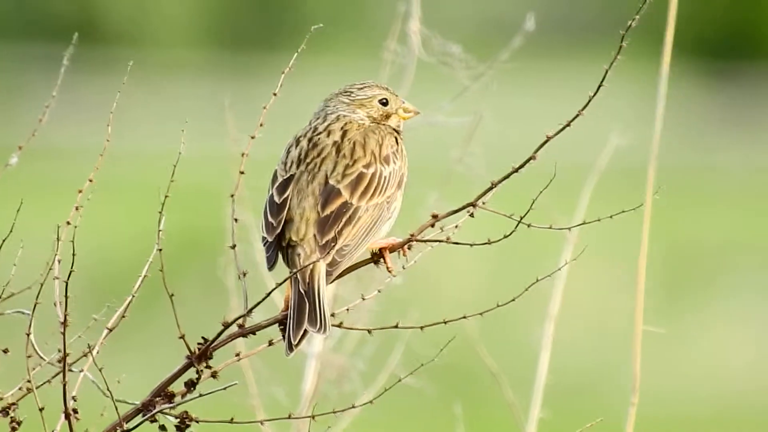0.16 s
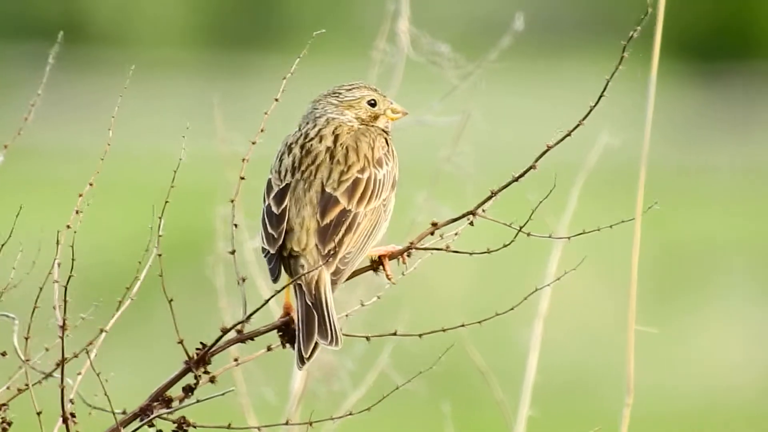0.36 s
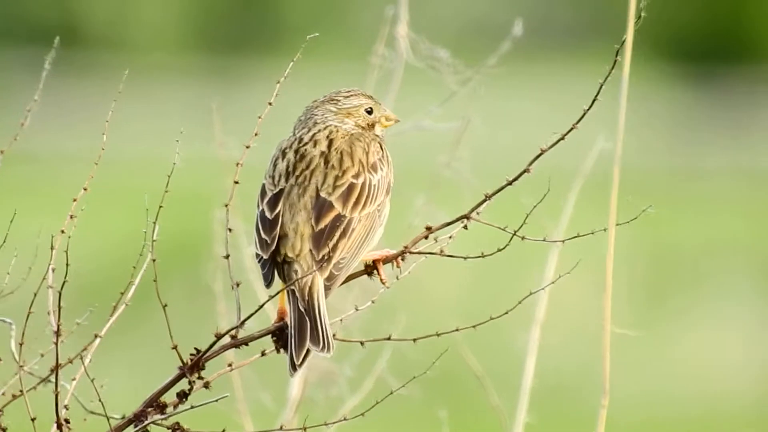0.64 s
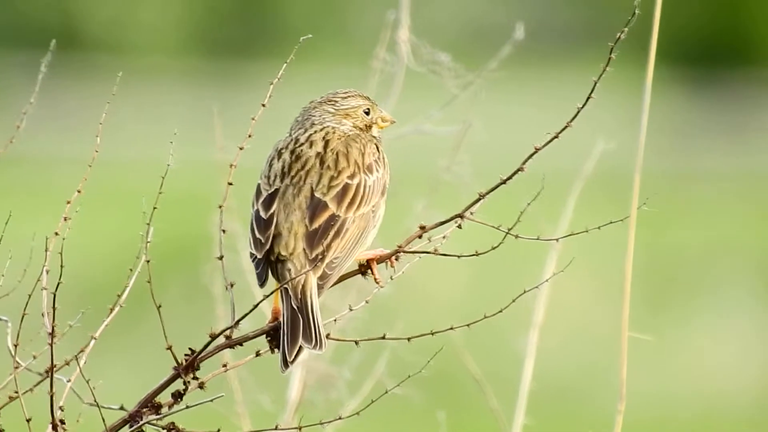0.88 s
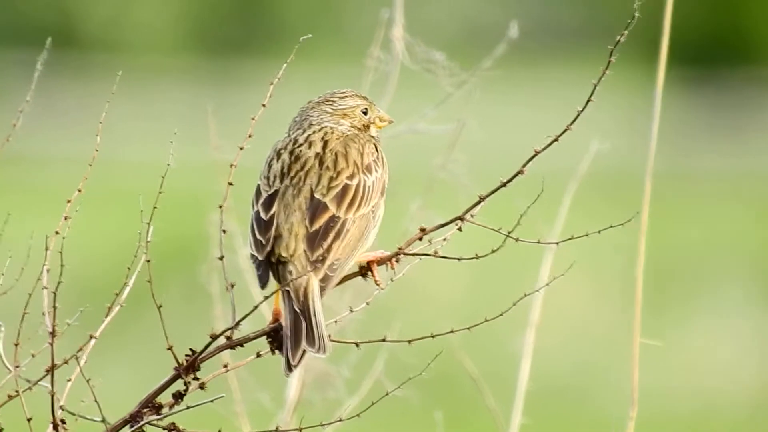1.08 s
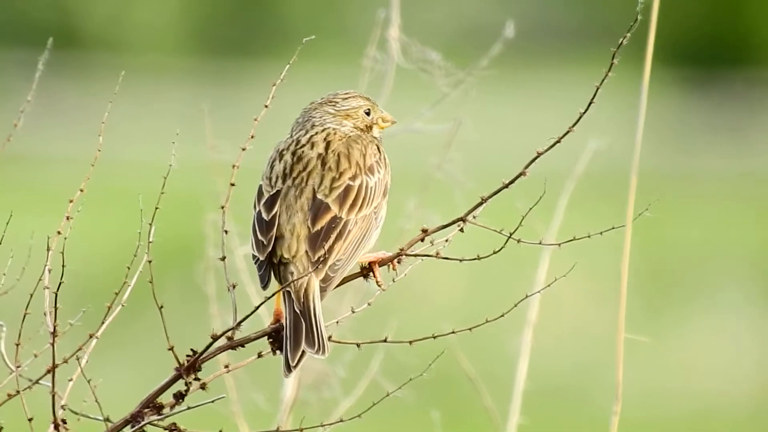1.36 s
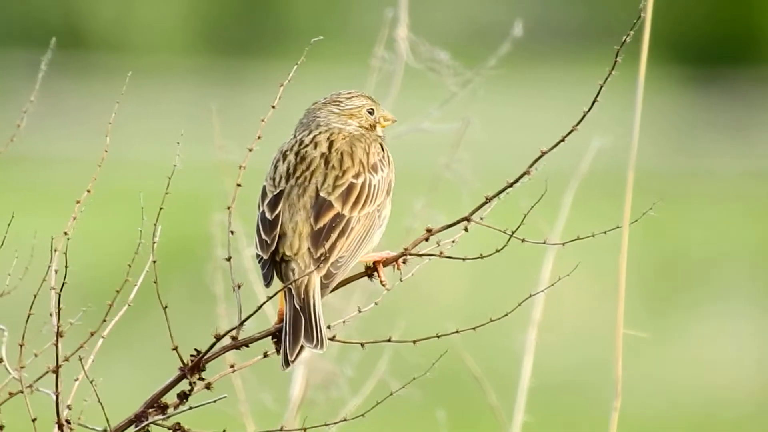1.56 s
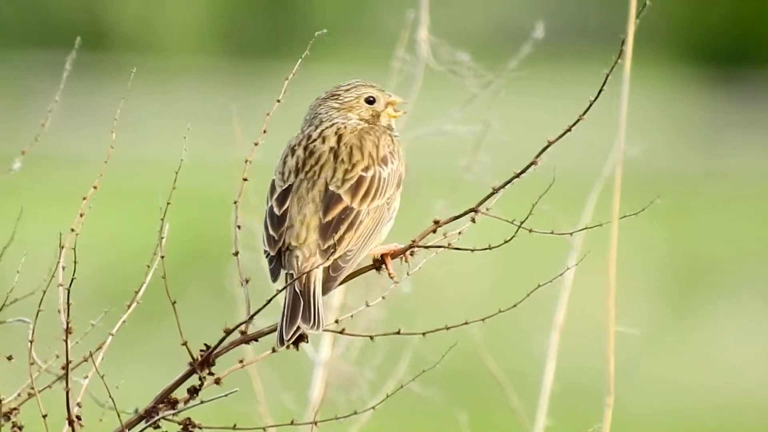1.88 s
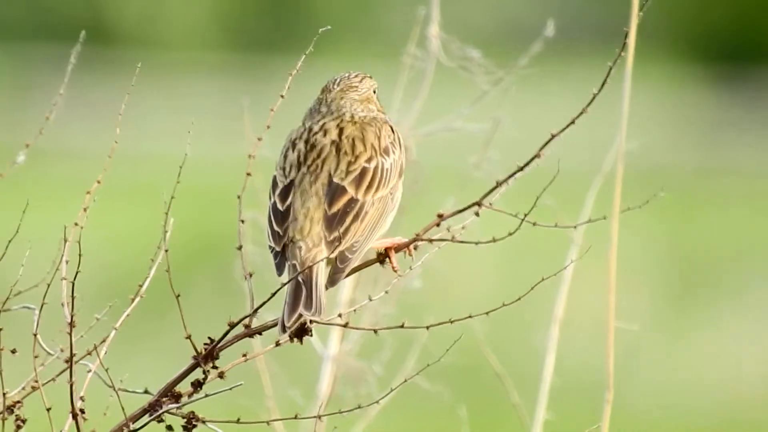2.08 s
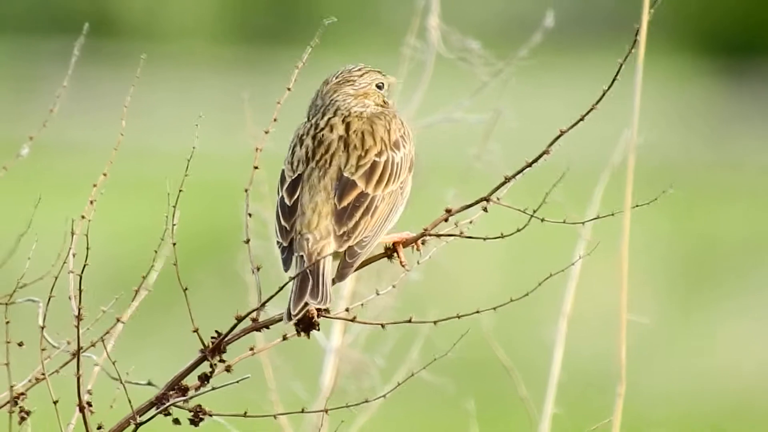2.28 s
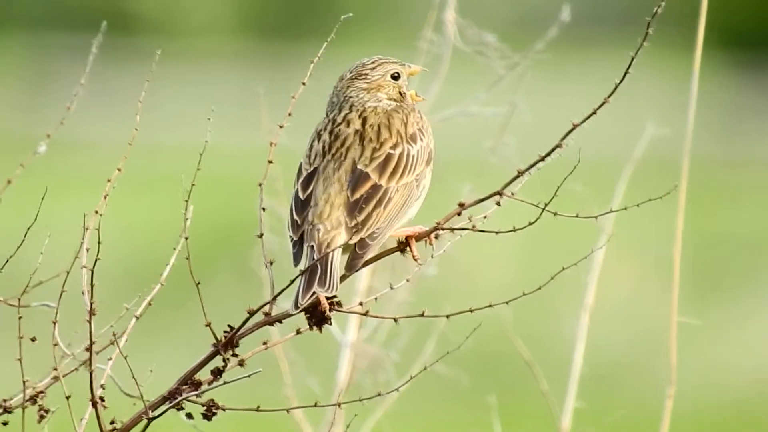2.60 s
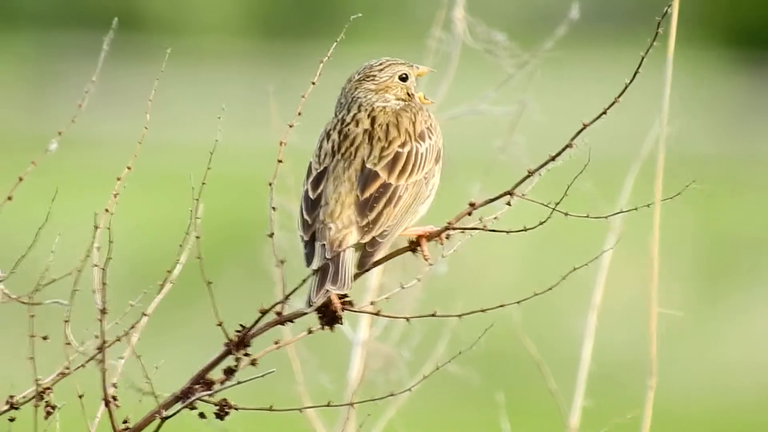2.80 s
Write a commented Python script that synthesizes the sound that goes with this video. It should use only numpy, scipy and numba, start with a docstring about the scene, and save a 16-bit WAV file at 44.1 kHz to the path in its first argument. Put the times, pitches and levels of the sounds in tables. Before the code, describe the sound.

A small bird sings outdoors through strong wind that rumbles and thumps unevenly on the microphone throughout. A distant bird chatters faintly in the first half second, over a soft field hum. The near bird gives three high, falling chips from about 1.8 to 2.2 seconds, three quick ticks around 2.5, then a fast jangling, buzzy rattle from 2.6 until about 3 seconds.

```python
"""Small bird in gusty wind

A bird on a twig chips, ticks three times, speeds up and breaks into a jangling rattle of glides and
modulated tones. A far bird chatters faintly at the start, over the hum of an open field. Turbulent
wind buffets the two microphone ports, each in its own way, and drives the recorder's limiter, whose
late, abrupt grip snaps the crests of the rumble."""
import sys
import numpy as np
from scipy import signal
from scipy.fft import rfft, irfft
from scipy.io import wavfile
from scipy.ndimage import uniform_filter1d
from numba import njit

SR = 44100
rng = np.random.default_rng(int(sys.argv[2]) if len(sys.argv) > 2 else 0)


def materialize(psi):
    """Save the field psi as 16-bit PCM at rate SR to the path in sys.argv[1].

    A 1-D psi becomes a single channel; in a 2-D psi each row is a channel.
    """
    bounded = np.clip(np.atleast_2d(psi).T, -1, 1)
    quanta = np.round(bounded * 32767).astype(np.int16)
    wavfile.write(sys.argv[1], SR, quanta)


N = 129654
BIN_HZ = np.fft.rfftfreq(N, 1 / SR)


def amp(db):
    """Amplitude ratio of a level in decibels."""
    return 10 ** (np.asarray(db) / 20)


def unit_rms(x):
    """Normalisation of each channel to unit power."""
    return x / np.sqrt(np.mean(x ** 2, -1, keepdims=True) + 1e-20)


def add(mix, start_s, sound):
    """Superposition of a sound on the mix."""
    part = mix[max(round(start_s * SR), 0):][:len(sound)]
    part += sound[:len(part)]


def noise(spectrum):
    """Spectral shaping: two independent noises of unit power, silent above the last point."""
    hz, db = np.transpose(spectrum)
    shape = amp(np.interp(np.log(BIN_HZ + 1), np.log(hz + 1), db)) * (BIN_HZ < hz[-1])
    return unit_rms(irfft(rfft(rng.standard_normal((2, N))) * shape, N))


def drift(hz):
    """Low-pass noise: a random fluctuation up to about hz."""
    return noise([(hz / 8, 0), (hz, -3), (hz * 4, -60)])


def whistle(pitch_hz, wobble=.01):
    """Phase integrates frequency: a slightly unsteady tone with a faint second harmonic."""
    jitter = unit_rms(uniform_filter1d(rng.standard_normal(len(pitch_hz)), size=40))
    phase = 2 * np.pi * (np.cumsum(pitch_hz * (1 + wobble * jitter)) / SR + rng.random())
    return np.sin(phase) + amp(-40) * np.sin(2 * phase)


def glide(length_s, from_hz, to_hz, db, wobble=.01):
    """A linear frequency sweep under a half-sine envelope."""
    progress = np.linspace(0, 1, int(length_s * SR))
    return amp(db) * np.sin(np.pi * progress) * whistle(from_hz + (to_hz - from_hz) * progress, wobble)


# Spectrum of the distant hum and hiss: frequency_hz, relative_db
FIELD_SPECTRUM = [(250, -25), (400, -8), (620, 0), (1000, -5), (1300, -16), (2600, -19), (5000, -13),
                  (9000, -22), (17000, -32)]

def field(level_db=-53):
    """Diffuse ambient sound: coherence between the ports falls as frequency rises."""
    left, independent = rfft(noise(FIELD_SPECTRUM))
    coherence = .6 / (1 + (BIN_HZ / 2000) ** 2)
    right = coherence * left + np.sqrt(1 - coherence ** 2) * independent
    return amp(level_db) * irfft([left, right], N)


# Notes of the far bird: start_s, pitch_hz, level_db
FAR_NOTES = [(.001, 5700, -38), (.049, 5480, -40), (0.079, 5180, -56), (0.103, 5700, -31),
             (.258, 5500, -41.5), (0.283, 5700, -43), (.33, 5200, -48), (.358, 5450, -45),
             (0.429, 5320, -51)]

def far_bird():
    """Faint tone bursts, roughened by random frequency modulation."""
    out = np.zeros(N)
    for start_s, hz, db in FAR_NOTES:
        add(out, start_s, glide(.018, hz, hz, db, wobble=.062))
    return out


# Gusts at each port: start_s, length_s, level_db
LEFT_PORT_GUSTS = [(0, 0.2, -2), (.25, 0.24, -6.5), (.53, 0.15, -4), (.72, 0.17, -6.5), (.95, 0.16, -8.5),
                   (1.44, 0.024, -12), (1.53, 0.047, -10), (1.68, .04, -16.5), (1.78, .12, -10.5),
                   (2.1, 0.075, -6.5), (2.27, 0.088, -10.5), (2.43, 0.15, -11), (2.6, .18, -11)]
RIGHT_PORT_GUSTS = [(0, 0.077, -1.5), (.14, 0.93, -3), (1.29, 0.038, -16), (1.44, 0.2, -5.5),
                    (1.67, 0.031, -10), (1.75, 0.18, -6.5), (2.06, 0.03, -6), (2.14, 0.076, -6),
                    (2.26, 0.12, -4), (2.46, 0.043, -7.5), (2.54, .6, -1)]

def gust_levels(breeze_db=-23, edge_s=.01):
    """Incoherent powers add: the level in dB of breeze plus gusts at each port."""
    t = np.arange(N) / SR
    power = np.full((2, N), amp(2 * breeze_db))
    for port, gusts in zip(power, (LEFT_PORT_GUSTS, RIGHT_PORT_GUSTS)):
        for start_s, length_s, db in gusts:
            inside_s = np.minimum(t - start_s, start_s + length_s - t)
            port += amp(2 * db) * np.clip(inside_s / edge_s + .5, 0, 1) ** 4
    return 10 * np.log10(power)


# Spectra of the wind at the ports: frequency_hz, relative_db
RUMBLE_SPECTRUM = [(10, -49.5), (45, -13), (75, -7), (105, -1.5), (170, -7.5), (230, -16), (330, -76.5),
                   (600, -53.5)]
ROAR_SPECTRUM = [(150, -5), (260, -3.5), (450, -14), (900, -28), (3000, -85.5)]

def wind(lump_db=1.5, flutter_db=6.5, reference_gust_db=-26, reference_roar_db=-58, roar_exponent=1.686):
    """Turbulent pressure: a lumpy rumble, and a fluttering roar that outgrows it by a power law."""
    rumble_db = gust_levels() + lump_db * drift(6)
    roar_db = reference_roar_db + roar_exponent * (rumble_db - reference_gust_db)
    roar_db += flutter_db * drift(47.5)
    return amp(rumble_db) * noise(RUMBLE_SPECTRUM) + amp(roar_db) * noise(ROAR_SPECTRUM)


# Slaps of air on each port, ahead of the limiter: time_s, peak_db
LEFT_PORT_SLAPS = [(.049, 2), (.097, -5), (.83, 0), (2.126, 2), (2.137, -2.5)]
RIGHT_PORT_SLAPS = [(.355, 8), (.417, 4.5), (0.575, 8), (0.667, 3), (.682, -2.5), (0.749, 1), (0.9, 1.5),
                    (0.99, 3.5), (1.447, -7), (2.304, 4.5), (2.366, 8), (2.728, 6.5), (2.903, -4)]

def air_slaps(decay_s=.0011):
    """Pressure transients: each is one quick push and a rebound."""
    out = np.zeros((2, N))
    age = np.arange(0, .015, 1 / SR) / decay_s
    pulse = age ** 2 * (1 - age / 4) * np.exp(-age)
    for port, slaps in zip(out, (LEFT_PORT_SLAPS, RIGHT_PORT_SLAPS)):
        for time_s, db in slaps:
            add(port, time_s - 2 * decay_s, amp(db) * pulse / pulse.max())
    return out


# The near bird's opening chips: start_s, level_db
CHIP_CALLS = [(1.788, -33), (2.007, -17.5), (2.19, -20)]
# Thin second voice after each chip: delay_s, length_s, from_hz, to_hz, relative_db
CHIP_SECOND_VOICE = [(.031, 0.0093, 8000, 6600, -29), (0.022, 0.015, 3670, 3420, -23.5)]

def chips(top_hz=6870, floor_hz=3900, fall_s=.0069, length_s=.023, fade_db=-30):
    """Exponential sweeps: each falls fast, flattens and fades, and a second voice follows."""
    out = np.zeros(N)
    t = np.arange(0, length_s, 1 / SR)
    pitch_hz = floor_hz + (top_hz - floor_hz) * np.exp(-t / fall_s)
    attack = np.minimum(t / .0041, 1) ** 2
    decay = amp(fade_db * t / length_s) * np.minimum((length_s - t) / .0056, 1)
    for start_s, db in CHIP_CALLS:
        add(out, start_s, amp(db) * attack * decay * whistle(pitch_hz))
        for delay_s, *sweep in CHIP_SECOND_VOICE:
            add(out, start_s + delay_s, amp(db) * glide(*sweep))
    return out


# The three ticks: start_s, level_db
TICK_CALLS = [(2.414, -26.5), (2.491, -24), (2.566, -26)]
# Glides within one tick: delay_s, length_s, from_hz, to_hz, relative_db
TICK_GLIDES = [(.001, 0.0061, 4080, 7800, -0.5), (.001, 0.011, 7480, 7500, 2),
               (.008, 0.015, 8770, 7700, -17), (0.017, 0.012, 7980, 7550, -7.5),
               (.007, .0064, 4400, 3950, -13), (.008, 0.028, 3870, 3780, -23)]

def ticks():
    """Temporal fusion: brief overlapping glides are heard as a single tick."""
    out = np.zeros(N)
    for start_s, db in TICK_CALLS:
        for delay_s, *sweep in TICK_GLIDES:
            add(out, start_s + delay_s, amp(db) * glide(*sweep))
    return out


# Single notes, most of them in the rattle: start_s, length_s, from_hz, to_hz, level_db
JANGLE_NOTES = [(2.33, 0.0022, 4300, 7850, -27.5), (2.331, 0.0093, 7550, 7450, -34),
                (2.336, 0.04, 7390, 7320, -37), (0.21, 0.016, 7400, 5070, -37.5),
                (2.627, 0.0091, 5920, 5040, -16.5), (2.666, 0.007, 6150, 5060, -13.5),
                (2.686, 0.0039, 5500, 6250, -35), (2.7, 0.0017, 5270, 7650, -17),
                (2.815, 0.0079, 5400, 5020, -21.5), (2.822, 0.013, 4840, 5640, -16),
                (2.874, 0.0074, 5600, 5000, -20), (2.878, 0.0047, 5090, 7040, -25.5),
                (2.883, 0.0028, 4940, 6100, -13), (2.878, 0.0051, 7280, 7260, -24),
                (2.891, 0.014, 7800, 6660, -22.5), (2.894, 0.0077, 5700, 4950, -15),
                (2.9, 0.0057, 4760, 5520, -20), (2.905, 0.0074, 5860, 4980, -10.5),
                (2.914, 0.0022, 5240, 5600, -7), (2.913, 0.011, 7900, 7430, -26),
                (2.927, 0.0061, 7600, 7140, -18)]

def jangle():
    """Short tones have broad spectra: click-like glides that jangle where they crowd together."""
    out = np.zeros(N)
    for start_s, *sweep in JANGLE_NOTES:
        add(out, start_s, glide(*sweep))
    return out


# Throbbing glides in the rattle: start_s, length_s, from_hz, to_hz, level_db, throb_hz
TRILL_NOTES = [(2.645, 0.067, 5720, 5610, -28.5, 360), (2.68, 0.015, 5580, 5500, -26.5, 110),
               (2.838, 0.025, 5440, 5090, -22, 220), (2.842, 0.035, 7150, 7200, -23.5, 250)]

def trills(swing_hz=346):
    """Amplitude and frequency modulation at one rate: the pitch swings with each throb."""
    out = np.zeros(N)
    for start_s, length_s, from_hz, to_hz, db, throb_hz in TRILL_NOTES:
        progress = np.linspace(0, 1, int(length_s * SR))
        throb_phase = 2 * np.pi * throb_hz * length_s * progress
        pitch_hz = from_hz + (to_hz - from_hz) * progress + swing_hz * np.sin(throb_phase)
        envelope = np.sin(np.pi * progress) ** .35 * (.55 - .44 * np.cos(throb_phase))
        add(out, start_s, amp(db) * envelope * whistle(pitch_hz))
    return out


# Course of the buzz in the rattle: time_s, carrier_hz, pulse_hz, level_db
BUZZ_PATH = [(2.723, 4640, 467, -19), (2.727, 4700, 415, -26.5), (2.745, 4560, 452, -32),
             (2.76, 4710, 498, -23.5), (2.789, 4740, 521, -22), (2.793, 5170, 506, -30),
             (2.798, 4850, 503, -50)]
# Spectral lines around the carrier: sideband_order, relative_db
BUZZ_SIDEBANDS = [(-1, -9), (0, 0), (1, -3), (2, -10), (3, -22)]

def buzz(octave_db=-28.5):
    """A pulsed carrier has sidebands spaced at the pulse rate: a comb, with a fainter one above."""
    time_s, carrier_hz, pulse_hz, level_db = np.transpose(BUZZ_PATH)
    t = np.arange(time_s[0], time_s[-1], 1 / SR)
    carrier_phase = 2 * np.pi * np.cumsum(np.interp(t, time_s, carrier_hz)) / SR
    pulse_phase = 2 * np.pi * np.cumsum(np.interp(t, time_s, pulse_hz)) / SR
    octave_phase = 2 * (carrier_phase - pulse_phase)  # an octave above the lowest line
    out, comb = np.zeros(N), 0
    for order, db in BUZZ_SIDEBANDS:
        comb += amp(db) * np.sin(carrier_phase + order * pulse_phase + .29 * order ** 2)
        comb += amp(db + octave_db) * np.sin(octave_phase + order * pulse_phase)
    add(out, time_s[0], amp(np.interp(t, time_s, level_db)) * comb * signal.windows.tukey(len(t), .1))
    return out


def outdoors(song, left_lag_s=1e-5, gap_s=.005):
    """Convolution adds a quick scatter off twigs and ground, and a faint tail, to the direct sound."""
    t = np.arange(SR // 2) / SR
    response = 0
    for db, t60_s in ((-11.5, .074), (-20, .3)):
        decays = rng.standard_normal((3, len(t))) * amp(-60 * t / t60_s) * (t > gap_s)
        tail = decays[:1] + .43 * decays[1:]  # a shared part plus each port's own
        response += amp(db) * tail / np.linalg.norm(tail[0])
    delay_s = left_lag_s * np.array([[.5], [-.5]])
    direct = irfft(rfft(song) * np.exp(-2j * np.pi * BIN_HZ * delay_s), N)
    return direct + signal.fftconvolve(song[None], response, axes=1)[:, :N]


def scene():
    """Superposition at the two ports of wind, field and birdsong."""
    background = wind() + air_slaps() + field()
    song = far_bird() + chips() + ticks() + jangle() + trills() + buzz()
    return background + outdoors(song)


@njit
def limiter_gain(target, attack, release):
    """First-order smoothing: the gain drops fast to a lower target, else recovers slowly toward one."""
    gain, held = np.ones(len(target)), 1.0
    for i in range(len(target)):
        held += (target[i] - held) * attack if target[i] < held else (1 - held) * release
        gain[i] = held
    return gain


def record(dry, threshold=.5, lag_s=.0005, attack_s=.000097, release_s=.025, step_db=.6864):
    """Peak limiting: one late gain for both ports moves in small steps that fizz; then a band limit."""
    late_peak = np.pad(abs(dry).max(0), (round(lag_s * SR), 0))[:N]
    attack = 1 - np.exp(-1 / (attack_s * SR))
    gain = limiter_gain(threshold / (late_peak + 1e-9), attack, 1 / (release_s * SR))
    stepped_gain = amp(step_db * np.round(20 * np.log10(gain) / step_db))
    low_pass = signal.firwin(511, 16000, window=("kaiser", 9), fs=SR)
    return signal.oaconvolve(dry * stepped_gain, low_pass[None], "same")


dry = scene()
out = record(dry)
materialize(out)
```